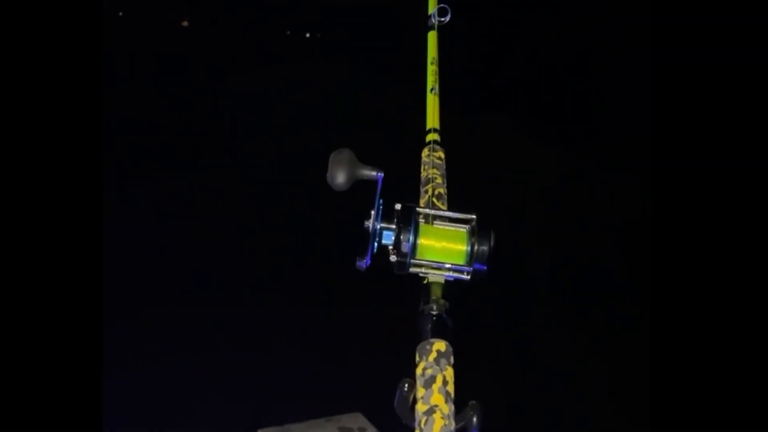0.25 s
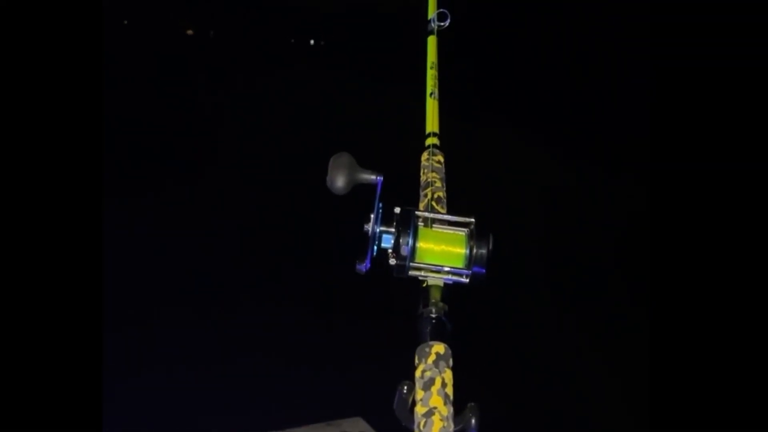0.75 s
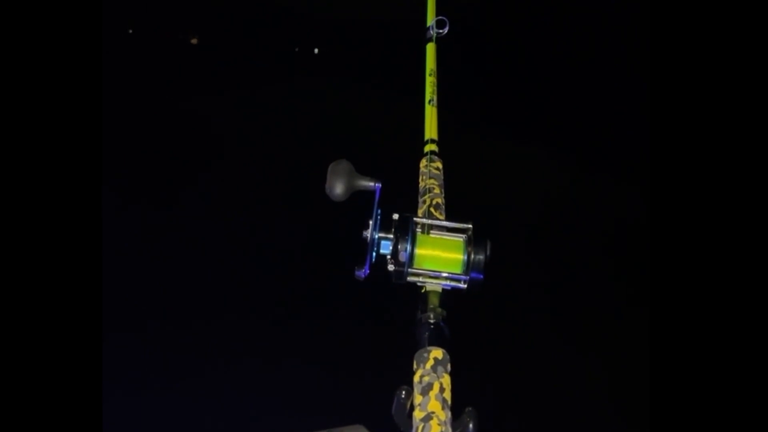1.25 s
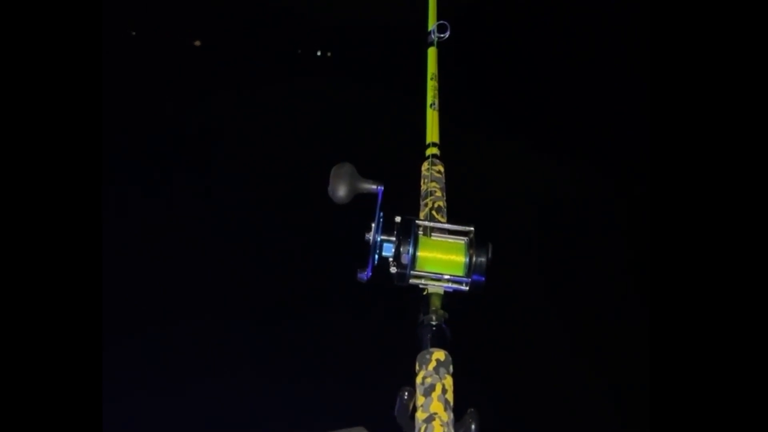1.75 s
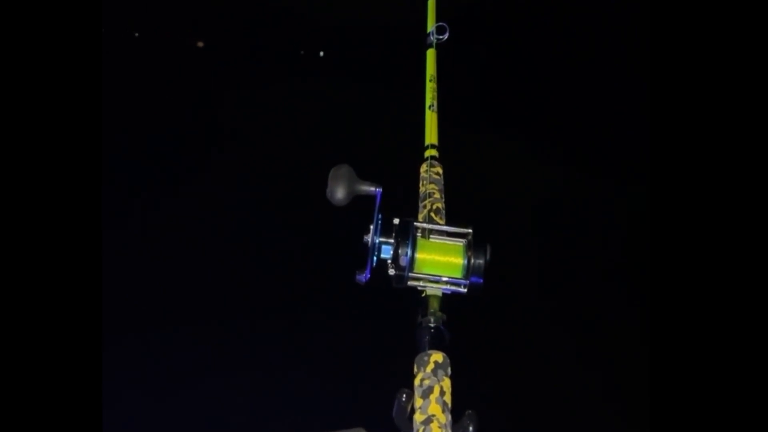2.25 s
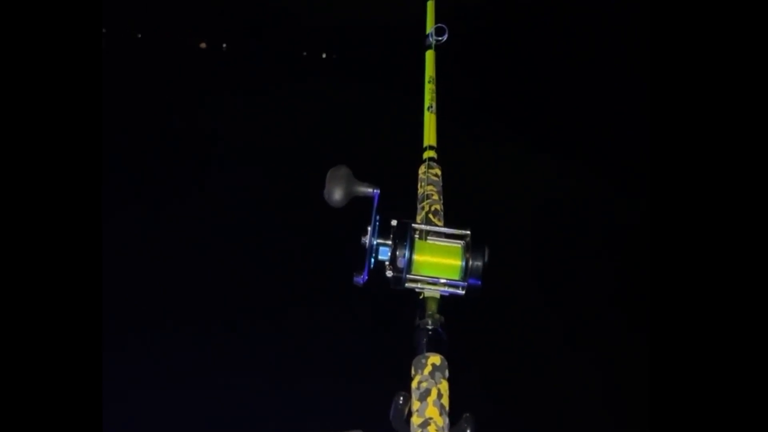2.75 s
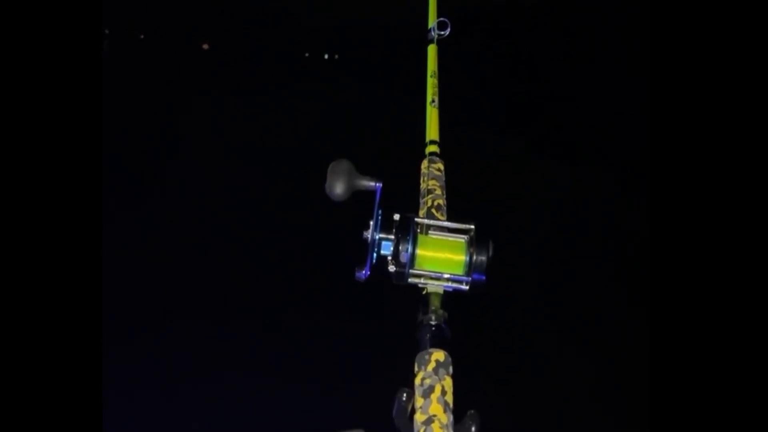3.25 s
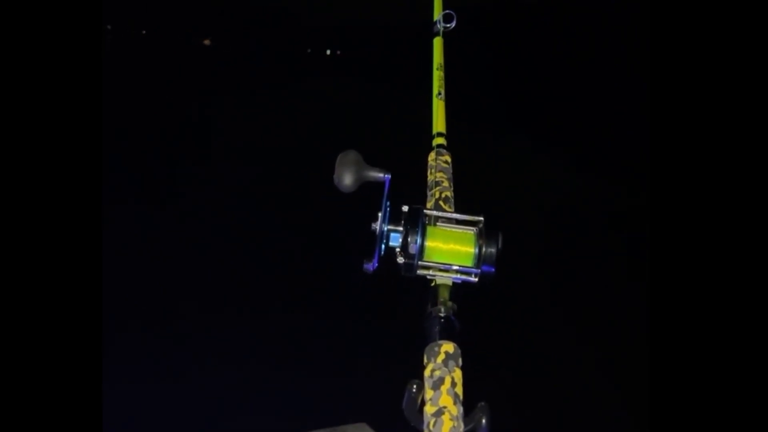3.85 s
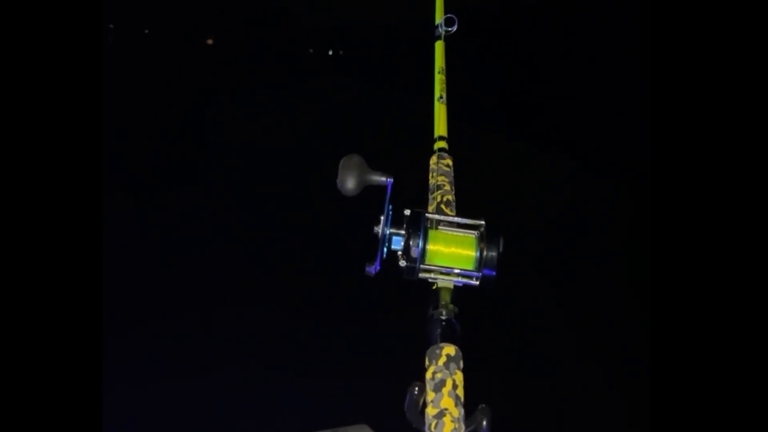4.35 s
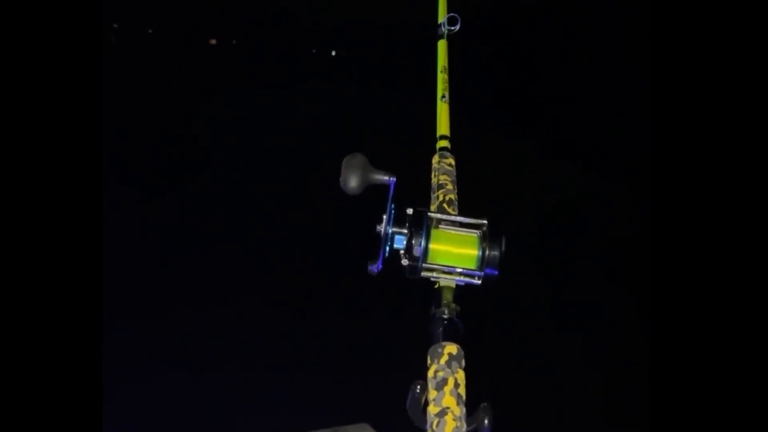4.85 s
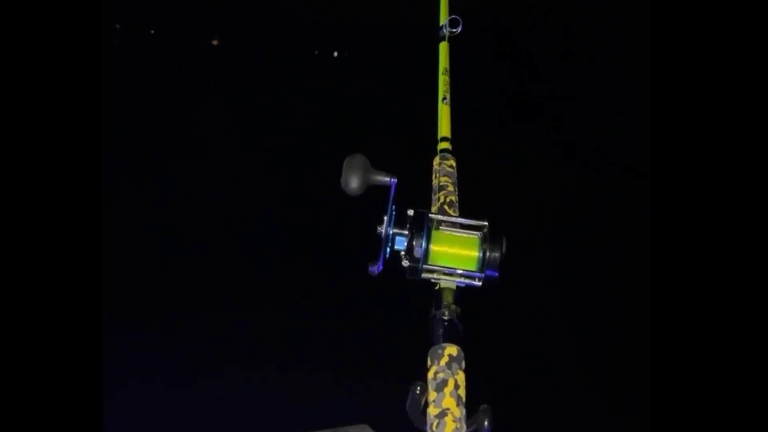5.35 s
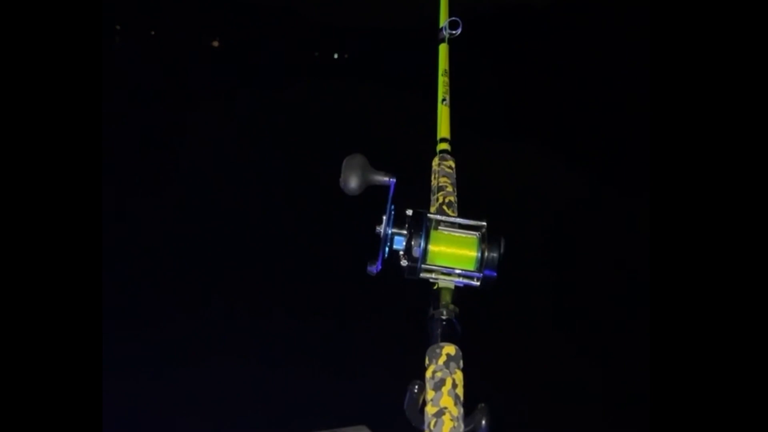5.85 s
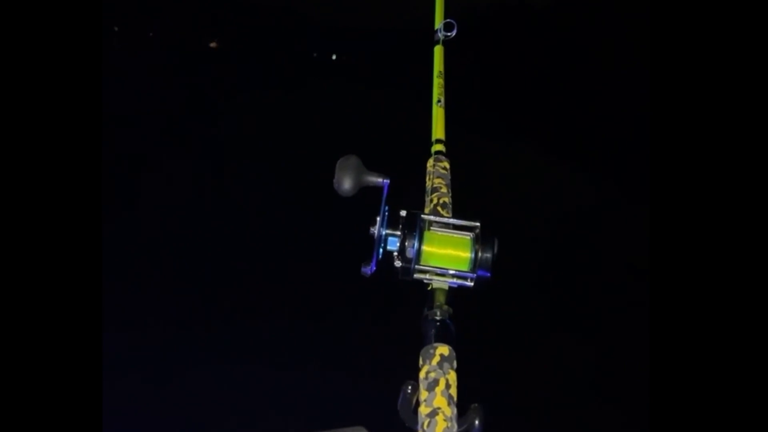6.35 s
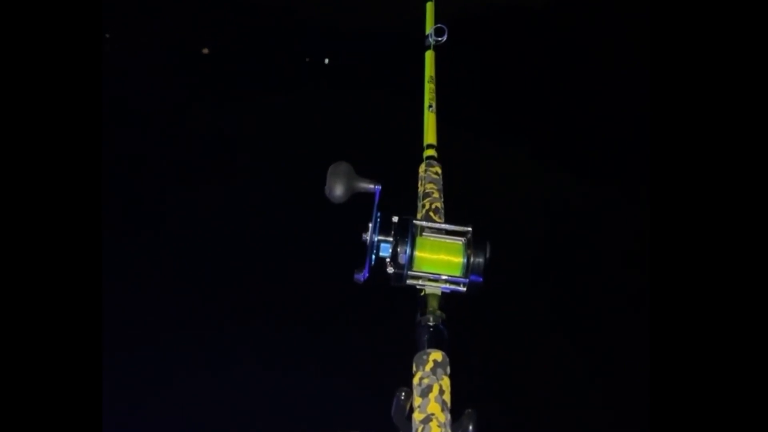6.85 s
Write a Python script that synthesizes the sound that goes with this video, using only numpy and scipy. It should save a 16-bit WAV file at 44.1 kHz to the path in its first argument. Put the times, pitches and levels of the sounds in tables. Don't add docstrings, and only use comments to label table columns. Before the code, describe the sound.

Outdoors at night, a quiet bed of small-motor buzz, low electrical hum, soft hiss and a thin far insect band. After about a second a close fishing reel begins clicking: five bursts of hard, bright metallic snaps, speeding up and slowing as line is pulled, separated by pauses. Tiny line ticks and low wind puffs touch the nearby microphone.

```python
import sys
import numpy as np
from scipy import signal
from scipy.fft import rfft, irfft
from scipy.io import wavfile
from scipy.ndimage import uniform_filter1d

SR = 44100
rng = np.random.default_rng(int(sys.argv[2]) if len(sys.argv) > 2 else 0)


def attenuation_scalar(level_db):
    decades = np.asarray(level_db, float) / 20
    return 10 ** decades


def file_out(sig):
    cols = np.atleast_2d(sig).T
    lim = np.clip(cols, -1, 1)
    pcm = np.round(lim * 32767).astype(np.int16)
    wavfile.write(sys.argv[1], SR, pcm)


N = 313110

# time_s, speed_teeth_per_s
PULLS = [
    [(1.1072, 16.73), (1.1725, 16.78), (1.2815, 28.0), (1.3428, 24.29), (1.488, 1.46)],
    [(2.6616, 18.03), (2.7028, 29.53), (2.8938, 24.03), (2.968, 27.91), (3.0838, 22.2), (3.1584, 23.16),
     (3.3655, 19.23), (3.4296, 13.5)],
    [(4.5983, 21.26), (4.6568, 35.05), (4.746, 38.93), (4.807, 37.15), (4.9138, 15.19)],
    [(5.8702, 18.4), (5.9634, 13.1), (6.0971, 34.7), (6.2011, 31.47), (6.322, 17.62)],
    [(6.898, 20.33), (6.9611, 26.55), (7.026, 23.18)],
]
TEETH = 9
CLICK_DB, CLICK_RISE_DB_PER_S = -30, 0.1276
OVAL_DB, OVAL_PLACE_TURNS = 0.43, 0.12

FRAME_HZ = [3680, 4020, 4200, 4560, 4750, 5140, 5610, 6130, 6450, 7050, 7300, 7930, 8250, 8850, 9120, 9400,
            9730]
# level_db, t60_s, swing_db, place_turns
FRAME_MODES = [(3.5, 0.014, 2.5, 1), (-2.5, 0.036, -15, 0.16), (-3, 0.014, 4, 0.42),
               (-2, 0.019, -2.5, 0.56), (-3.5, 0.033, 7.5, 0.68), (-5, 0.029, 6, 0.18),
               (-6.5, 0.031, 4., 0.14), (-3.5, 0.029, 2, 0.24), (-11.5, 0.019, 20, .03),
               (-7.5, 0.041, -4.5, 0.72), (-7, 0.047, 9.5, 0.13), (-6, 0.021, 2, 0.9),
               (-15, 0.019, 9, 0.092), (-1, 0.034, 5, 0.3), (2.5, 0.014, 6.5, 0.75), (-0.5, 0.011, 30, 0.2),
               (-10.5, 0.019, -17.5, 0.33)]
# freq_hz, density_db_per_hz
CRACK_SPECTRUM = [(1000, -28.5), (2500, -16.5), (3300, -34), (3900, -1), (5400, -15), (7500, -12.5),
                  (9000, -4.5), (10500, -17), (11500, -7.5), (13000, -12.5), (15300, -12), (16000, -17),
                  (16800, -63)]
# freq_hz, density_db_per_hz
ROD_SPECTRUM = [(300, -70), (680, -25), (800, -8.5), (1100, -4.5), (1500, -1.5), (2050, -4), (2330, -11.5),
                (2550, -3.5), (3300, -4), (6000, -69)]
# freq_hz, level_db, t60_s
ROD_MODES = [(759, -4.5, 0.092), (869.6, -5, 0.13), (1145, -4.5, 0.13), (1483, 1.5, .1), (2077, 2.5, 0.11)]
# delay_ms, level_db, sign
CRACK_ECHOES = [(1.685, -6, 1), (3.7, -16, 1), (8.4, -28, 1)]
# delay_ms, level_db, sign
RING_ECHOES = [(2.07, -6, -1), (14.2, -37, -1), (21.6, -42, 1)]

# time_s, peak_db
SLOW_LANDINGS = [(1.1368, -62), (1.4182, -58), (1.5371, -57), (3.3894, -60), (3.4719, -56), (4.9442, -56),
                 (5.904, -57), (5.9672, -56), (6.3574, -56), (7.0573, -57)]
# time_s, peak_db, freq_hz
LINE_TICKS = [
    (1.02, -47, 7020),
    (1.9498, -54, 7800),
    (1.9586, -42.5, 6500),
    (4.4985, -51, 6000),
]

# time_s, freq_hz
MOTOR_ORDER_37 = [(0.0, 1903), (0.06, 1896), (1.9, 1896), (3.0, 1890), (3.44, 1898), (3.76, 1883),
                  (4.25, 1888), (5.77, 1885), (6.58, 1897), (7.1, 1890)]
# freq_hz, level_db
ORDER_LINES = [(409.1, -74), (559.9, -73), (613.7, -76), (662.1, -81), (764.4, -84), (812.9, -89.5),
               (866.7, -81.5), (920.5, -79.5), (969.0, -82), (1017, -73), (1071, -80.5), (1222, -75.5),
               (1276, -82.5), (1324, -72), (1378, -69), (1480, -74.5), (1583, -79.5), (1631, -94),
               (1680, -116), (1733, -68), (1836, -66), (1884, -62), (1938, -76), (1986, -71.5),
               (2089, -68.5), (2143, -71.5), (2552, -80), (2853, -74)]
# time_s, level_db
HOUSING_TAP = [(0, -73), (1.2, -73), (1.5, -66), (2.6, -66), (3.5, -72), (4.5, -72), (5.5, -71), (7.1, -71)]
MOTOR_START_DB, MOTOR_START_S = -3.5, 0.27

# time_s, freq_hz, level_db
HUM = [(0.0, 120.5, -56), (0.12, 120.6, -56.5), (4.33, 121.4, -55.5), (4.45, 122, -53.5),
       (4.61, 120.6, -53), (4.71, 120.5, -54.5), (6.84, 121.2, -54), (6.94, 120, -55.5), (7.1, 119, -52)]
# freq_hz, density_db_per_hz
HISS_SPECTRUM = [(60, -11), (150, -8), (300, -17.5), (550, -25), (750, -33), (1150, -33.5), (2050, -18.5),
                 (2400, -26), (4600, -31), (7000, -45), (10500, -55), (13500, -46.5), (14600, -56),
                 (15500, -60)]
# time_s, level_db
HISS_LEVEL = [(0.0, -52), (7.1, -51.5)]

# freq_hz, density_db_per_hz
BREEZE_SPECTRUM = [(12, -29), (25, -27), (40, -9), (62, 3.5), (90, 0.5), (130, -7), (250, -27), (500, -83)]
# freq_hz, density_db_per_hz
PUFF_SPECTRUM = [(12, -25), (25, -9), (40, -3.5), (60, 0.5), (90, -9), (130, -15), (250, -50), (500, -85)]
# start_s, hold_s, level_db
PUFFS = [
    (2.45, 0.11, -34.5),
    (5.58, 0.037, -37),
    (5.3, 0.21, -52),
    (6.88, 0.086, -45.5),
    (7.05, .1, -35.5),
]
BREEZE_DB = -48
PUFF_RISE_S, PUFF_FALL_S = 0.018, 0.094


def clicks():
    times_s = []
    for pull in PULLS:
        t = np.arange(pull[0][0], pull[-1][0], 1 / SR)
        teeth_passed = np.cumsum(np.interp(t, *np.transpose(pull))) / SR
        times_s += list(np.interp(np.arange(int(teeth_passed[-1]) + 1), teeth_passed, t))
    times_s = np.array(times_s)
    oval = np.cos(2 * np.pi * (2 * np.arange(len(times_s)) / TEETH + OVAL_PLACE_TURNS))
    return np.c_[times_s, CLICK_DB + CLICK_RISE_DB_PER_S * times_s + OVAL_DB * oval]


def reel(click_rows):
    size, count = 2048, len(click_rows)
    out, t = np.zeros(N), np.arange(size) / SR
    crack, rod = causal(CRACK_SPECTRUM)[:256], causal(ROD_SPECTRUM)[:600]
    small_body = signal.cheby1(6, 1, 3480, "high", fs=SR, output="sos")
    hz = np.array(FRAME_HZ)[:, None]
    mode_db, t60_s, swing_db, place_turns = np.transpose(FRAME_MODES)[:, :, None]
    tooth_noise = rng.standard_normal((TEETH, 2, size))
    click_noise = rng.standard_normal((count, 2, size))
    common_noise = rng.standard_normal(size)
    chance = rng.standard_normal((count, 2, len(hz), 1))
    knock_chance = rng.standard_normal((count, len(ROD_MODES), 2))

    for k, (time_s, level_db) in enumerate(click_rows):
        oval = 2 * np.pi * (2 * k / TEETH + place_turns)
        strike_db = np.clip(swing_db, 0, 4) * np.cos(oval) + 1.3 * chance[k, 0]
        lean_turns = 0.081 * (hz / 9000) ** 2 * (np.sin(oval) + 1.2 * chance[k, 1])
        decay = attenuation_scalar(mode_db + strike_db - 60 * t / (0.47 * t60_s))
        modes = (decay * np.sin(2 * np.pi * (hz * t + lean_turns))).sum(0)
        modes *= np.minimum(t / 0.00026, 1)
        modes = echoed(signal.sosfilt(small_body, modes), RING_ECHOES)

        grit, hollow = 0.8 * tooth_noise[k % TEETH] + 0.5 * click_noise[k]
        contact = np.r_[1, 0.5 * grit[:14], np.zeros(size)]
        snap = echoed(np.convolve(crack, contact)[:size], CRACK_ECHOES)
        rattle_decay = attenuation_scalar(-60 * t / 0.019) + attenuation_scalar(-47 - 60 * t / 0.06)
        rattle = np.convolve(grit * rattle_decay, crack)[:size]
        boom = np.convolve((common_noise + 0.4 * hollow) * attenuation_scalar(-60 * t / 0.053), rod)[:size]
        boom *= signal.windows.tukey(size, 0.04)
        spool_db = -19.5 + 6.5 * np.cos(2 * np.pi * (2 * k / TEETH + 0.082))

        click = unit(modes) + attenuation_scalar(-4.0) * unit(snap) + attenuation_scalar(-6.0) * unit(rattle)
        click += attenuation_scalar(-12.5) * unit(boom) + attenuation_scalar(spool_db) * unit(ring(2753, 0.025, size=size))
        click += attenuation_scalar(-47) * knock(knock_chance[k])
        add(out, time_s + 0.0002, attenuation_scalar(level_db + 26.4) * unit(click))
    return out


def knock(chance):
    size = 2048
    t, out = np.arange(size) / SR, np.zeros(size)
    for (hz, db, t60_s), (level, pitch) in zip(ROD_MODES, chance):
        out += attenuation_scalar(db + 4.2 * level) * ring(hz * (1 + 0.03 * pitch), t60_s, size=size)
    return out * (1 - np.exp(-t / 0.006)) * signal.windows.tukey(size, 0.3)


def pawl(click_rows):
    out, times_s = np.zeros(N), click_rows[:, 0]
    gaps_s, chance = np.diff(times_s), rng.standard_normal((len(times_s), 4))
    landings = []
    for time_s, gap_s, z in zip(times_s, gaps_s, chance[:, 0]):
        if gap_s < 0.058:
            landings.append((time_s + 0.62 * gap_s - 0.002, -62 + 3.5 * z))
    for (time_s, db), z in zip(landings + list(SLOW_LANDINGS), chance):
        spring = ring(7000 * (1 + 0.008 * z[1]), 0.028)
        spring += attenuation_scalar(-4) * ring(7230 * (1 + 0.008 * z[2]), 0.02)
        tap = ring(12500 * (1 + 0.06 * z[3]), 0.004)
        tap += 0.5 * ring(14600, 0.006) + ring(9500, 0.004)
        add(out, time_s, attenuation_scalar(db + 1.5) * (spring + attenuation_scalar(-9) * tap))
    return out


def line_ticks():
    out = np.zeros(N)
    for time_s, db, hz in LINE_TICKS:
        add(out, time_s, attenuation_scalar(db) * (ring(hz, 0.0031) + 0.43 * ring(1.4 * hz, 0.0018)))
    return out


def motor():
    turns = np.cumsum(curve(MOTOR_ORDER_37)[0] / 37) / SR
    out = np.zeros(N)
    for hz, db in ORDER_LINES:
        order = round(hz / 51)
        level = attenuation_scalar(db + 4.0 + 0.65 * drift(9.0))
        out += level * np.sin(2 * np.pi * (order * turns + rng.random() + 0.05 * drift(12.0)))
    out *= attenuation_scalar(MOTOR_START_DB * np.exp(-np.arange(N) / SR / MOTOR_START_S))
    taps = np.diff(np.floor(turns), prepend=0) * attenuation_scalar(3.3 * drift(2.75))
    housing = ring(6300, 0.035) + 0.8 * ring(6250, 0.0073)
    return out + attenuation_scalar(curve(HOUSING_TAP)[0]) * np.convolve(taps, housing)[:N]


def hum():
    hz, db = curve(HUM)
    level = attenuation_scalar(db + 6.0 + 1.5 * drift(28.0))
    return level * np.sin(2 * np.pi * (np.cumsum(hz) / SR + 0.028 * drift(9.8)))


def insects():
    chorus = band(band(rng.standard_normal(N), 3810, 310), 3810, 310)
    return attenuation_scalar(-64 + 0.15 * drift(9.3)) * evened(chorus)


def wind():
    breeze, deep, t = coloured(BREEZE_SPECTRUM), coloured(PUFF_SPECTRUM), np.arange(N) / SR
    steady = deep / np.sqrt(uniform_filter1d(deep ** 2, 3000))
    puffs = np.zeros(N)
    for start_s, hold_s, db in PUFFS:
        fall_s = PUFF_RISE_S + hold_s
        corners_s = [0, PUFF_RISE_S, fall_s, fall_s + PUFF_FALL_S]
        puffs += attenuation_scalar(db) * np.interp(t - start_s, corners_s, [0, 1, 1, 0])
    return attenuation_scalar(BREEZE_DB) * breeze + puffs * steady


def hiss():
    return attenuation_scalar(curve(HISS_LEVEL)[0]) * coloured(HISS_SPECTRUM)


def read(points, hz):
    f, value = np.transpose(points)
    return np.interp(np.log(hz + 1), np.log(f + 1), value)


def curve(rows):
    s, *columns = np.transpose(rows)
    return [np.interp(np.arange(N) / SR, s, c) for c in columns]


def evened(x):
    return x / np.sqrt(np.mean(x ** 2) + 1e-20)


def unit(x):
    return x / np.linalg.norm(x)


def add(mix, s, sound):
    part = mix[round(s * SR):][:len(sound)]
    part += sound[:len(part)]


def echoed(x, echoes):
    out = x.copy()
    for ms, db, sign in echoes:
        add(out, ms / 1000, sign * attenuation_scalar(db) * x)
    return out


def coloured(points):
    gain = attenuation_scalar(read(points, np.fft.rfftfreq(N, 1 / SR)))
    return evened(irfft(rfft(rng.standard_normal(N)) * gain, N))


def band(x, hz, width_hz):
    return signal.lfilter(*signal.iirpeak(hz, hz / width_hz, SR), x)


def drift(top_hz):
    steps = rng.standard_normal(200)
    return evened(np.interp(np.arange(N) / SR * top_hz, np.arange(200), steps))


def causal(points, size=2048):
    log_gain = np.log(attenuation_scalar(read(points, abs(np.fft.fftfreq(size, 1 / SR)))))
    return np.fft.ifft(np.exp(log_gain - 1j * signal.hilbert(log_gain).imag)).real


def ring(hz, t60_s, size=1500):
    t = np.arange(size) / SR
    return attenuation_scalar(-60 * t / t60_s) * np.sin(2 * np.pi * hz * t)


def scene():
    click_rows = clicks()
    near = reel(click_rows) + pawl(click_rows) + line_ticks()
    return (near + motor() + hum() + insects() + wind() + hiss())[None]


def top_cut(x):
    return signal.sosfilt(signal.butter(12, 17030, fs=SR, output="sos"), x)


def record(dry):
    heard = signal.oaconvolve(dry, signal.firwin(301, 16850, fs=SR)[None], "same")
    return top_cut(heard)


dry = scene()
out = record(dry)
file_out(out)
```